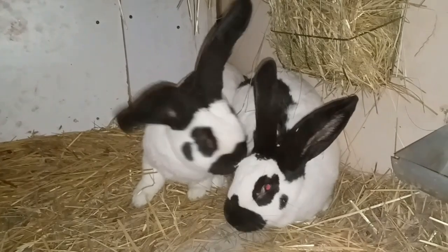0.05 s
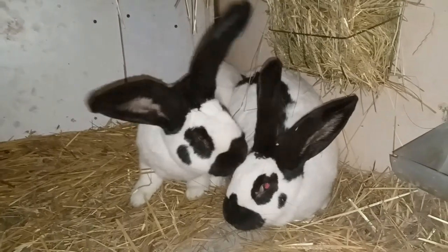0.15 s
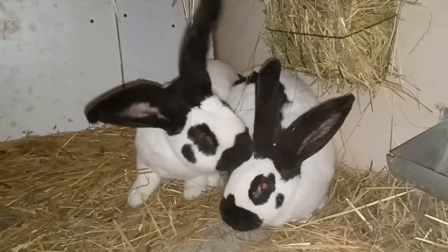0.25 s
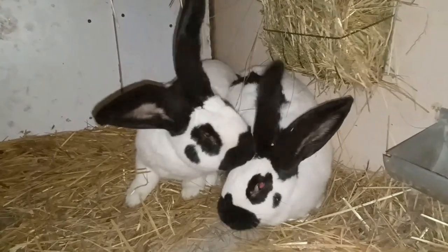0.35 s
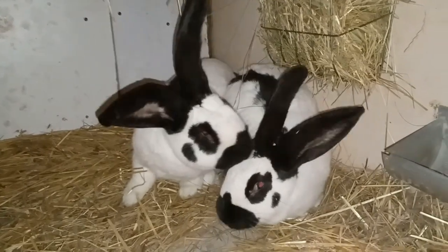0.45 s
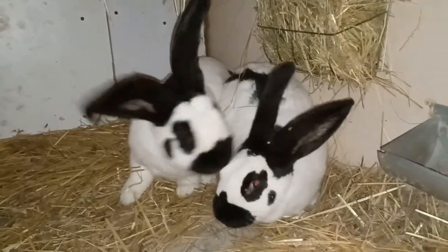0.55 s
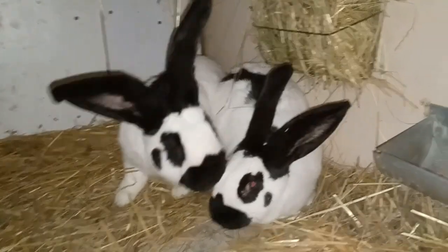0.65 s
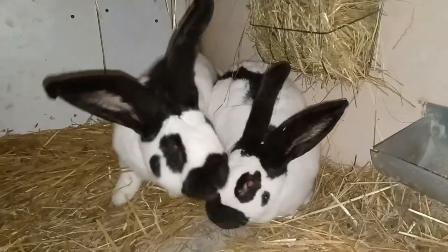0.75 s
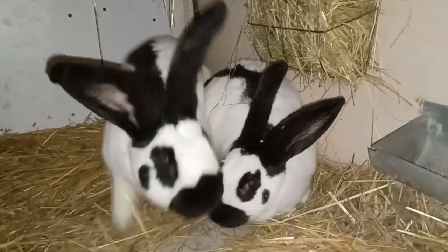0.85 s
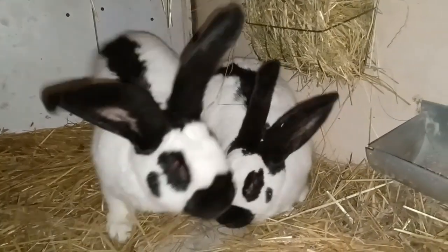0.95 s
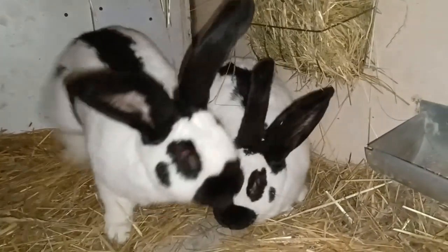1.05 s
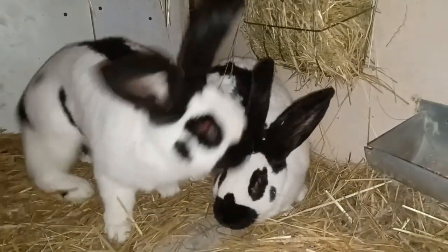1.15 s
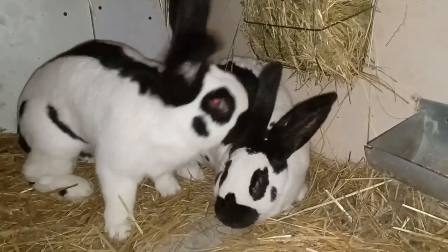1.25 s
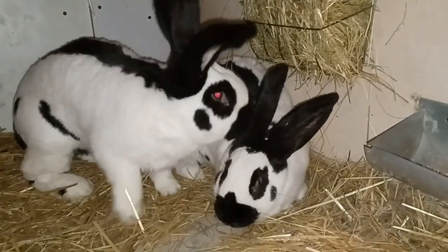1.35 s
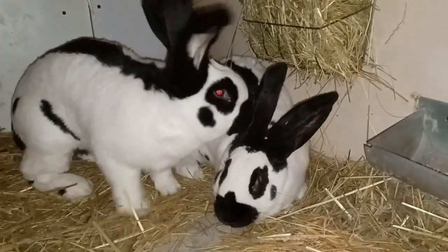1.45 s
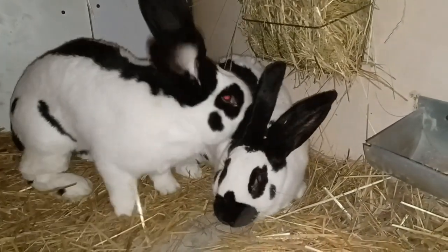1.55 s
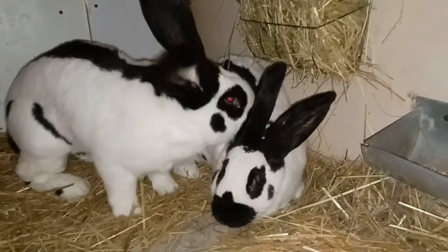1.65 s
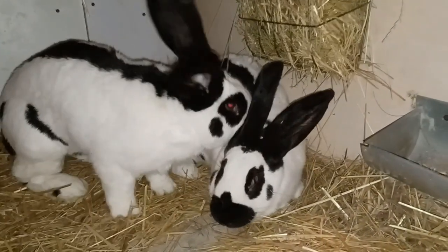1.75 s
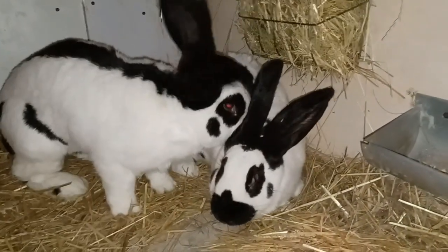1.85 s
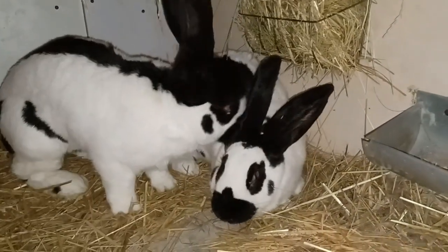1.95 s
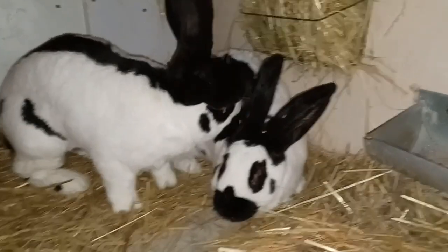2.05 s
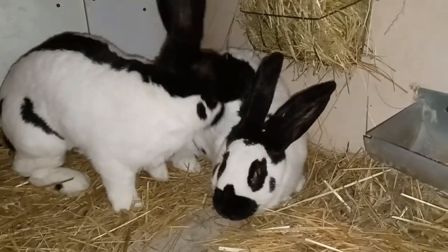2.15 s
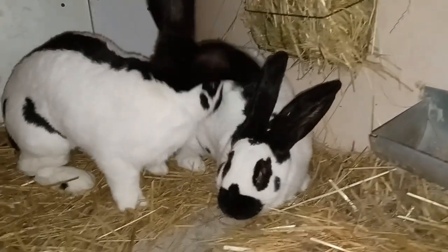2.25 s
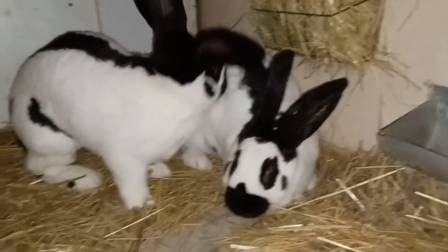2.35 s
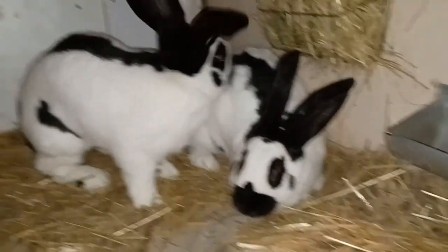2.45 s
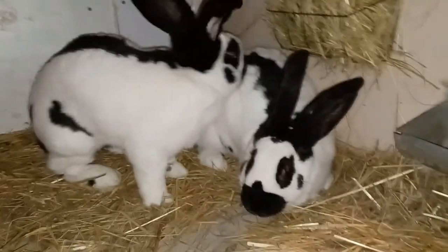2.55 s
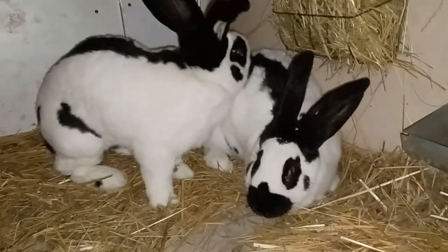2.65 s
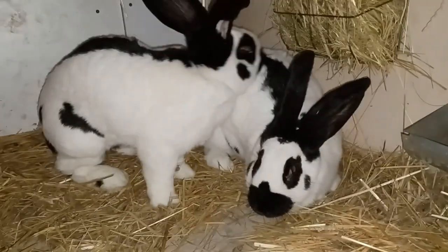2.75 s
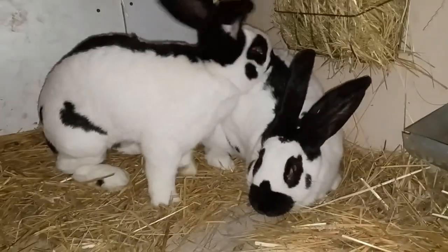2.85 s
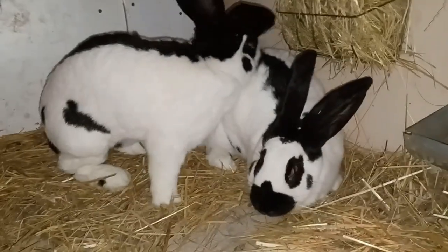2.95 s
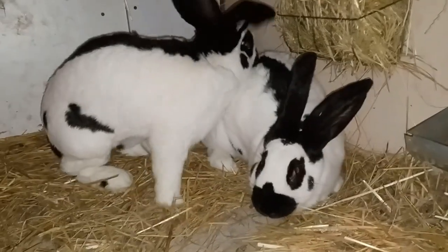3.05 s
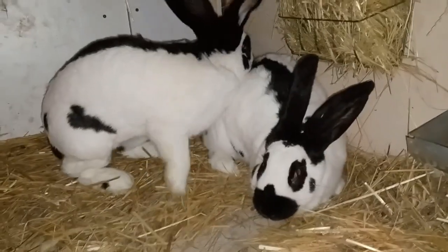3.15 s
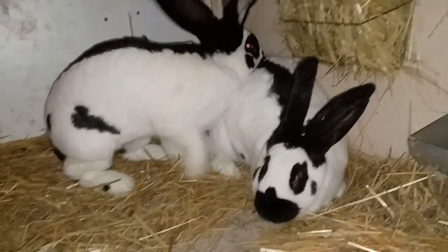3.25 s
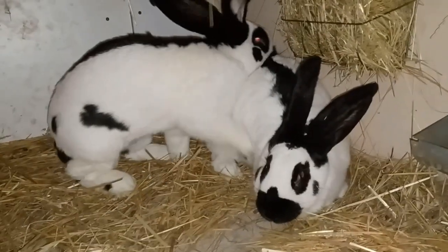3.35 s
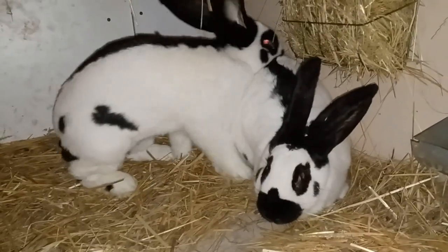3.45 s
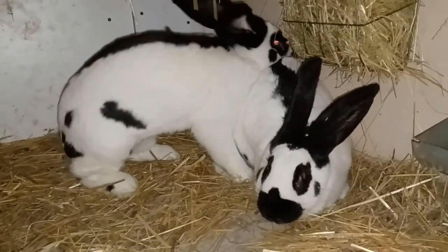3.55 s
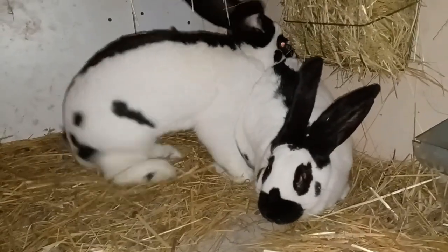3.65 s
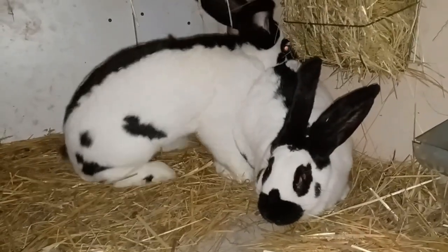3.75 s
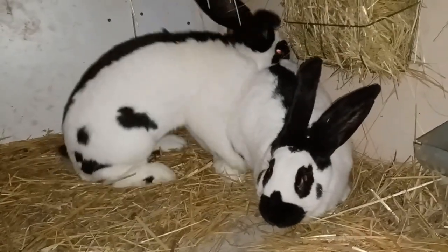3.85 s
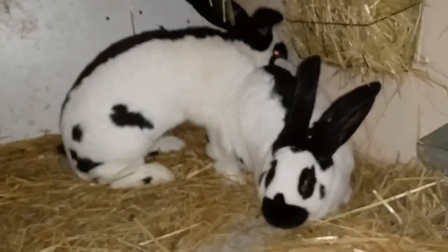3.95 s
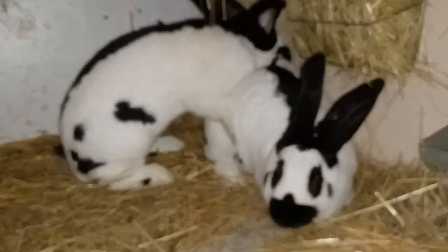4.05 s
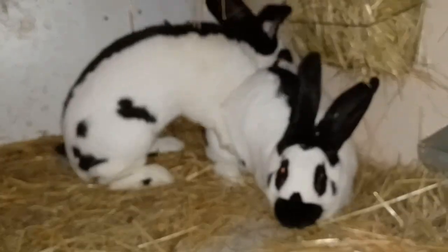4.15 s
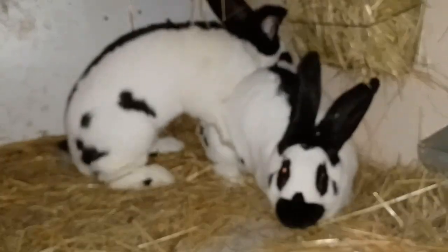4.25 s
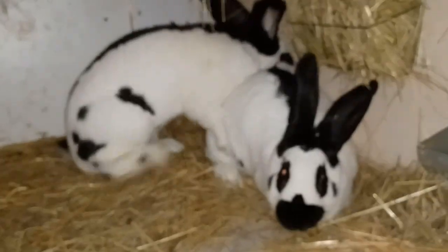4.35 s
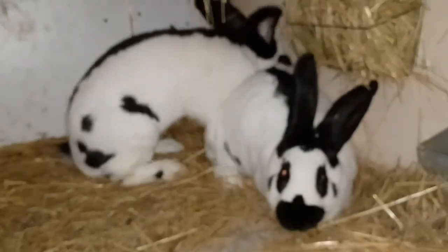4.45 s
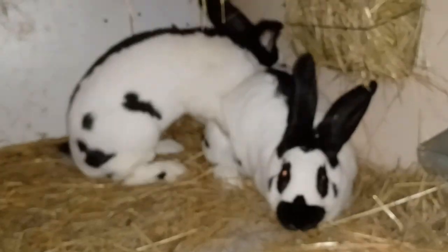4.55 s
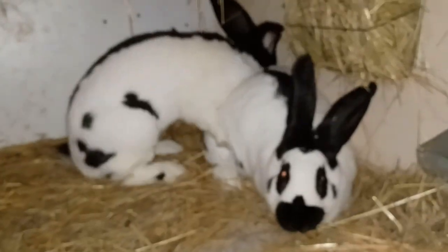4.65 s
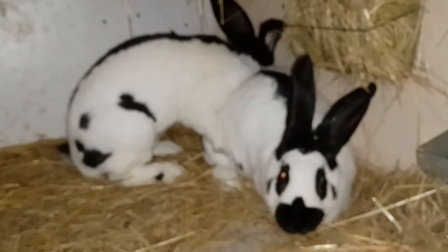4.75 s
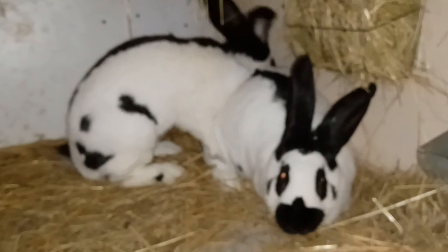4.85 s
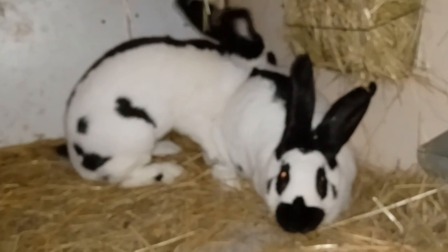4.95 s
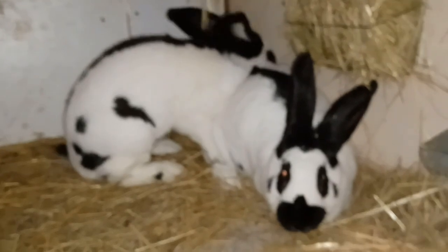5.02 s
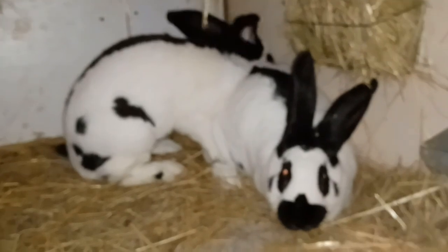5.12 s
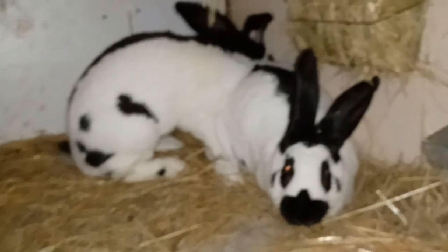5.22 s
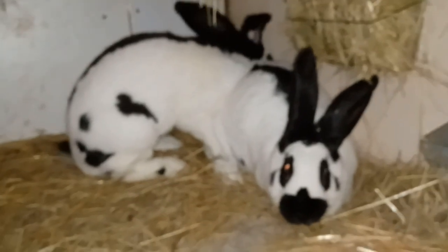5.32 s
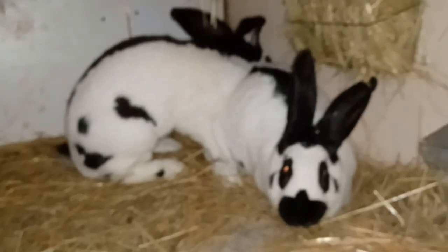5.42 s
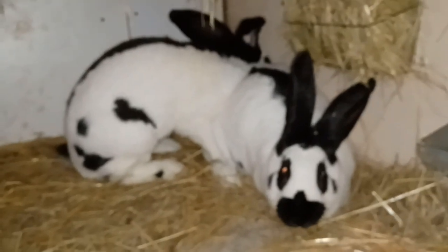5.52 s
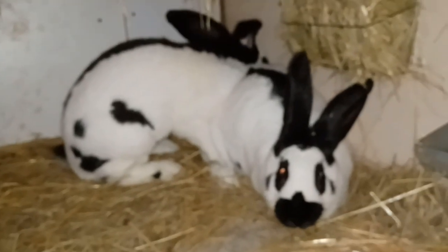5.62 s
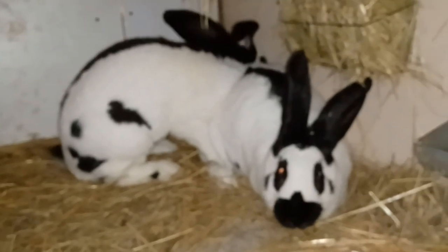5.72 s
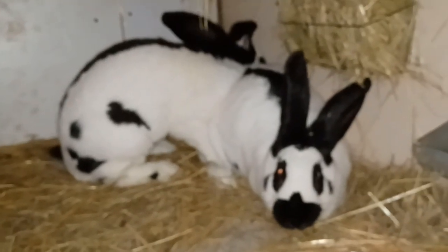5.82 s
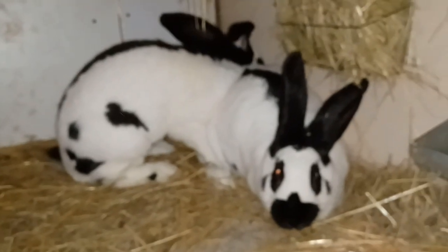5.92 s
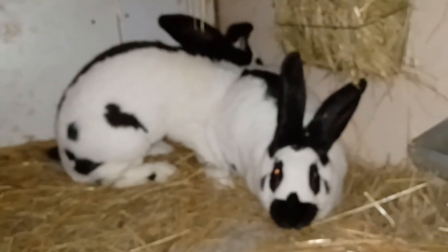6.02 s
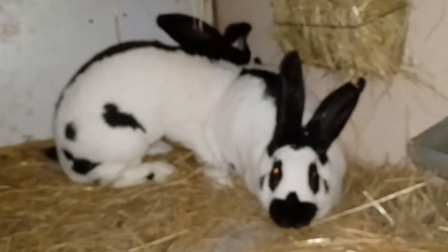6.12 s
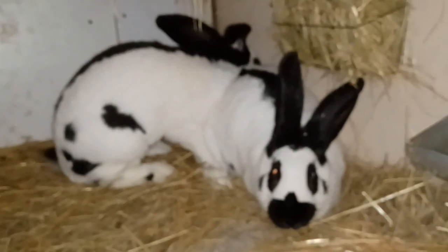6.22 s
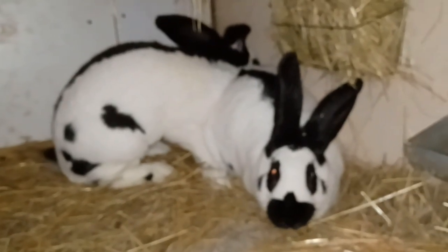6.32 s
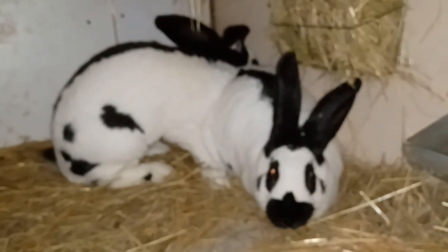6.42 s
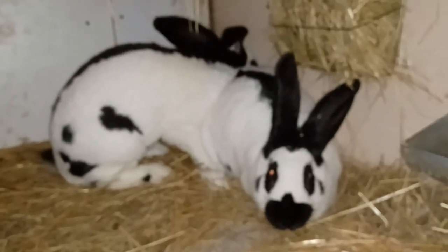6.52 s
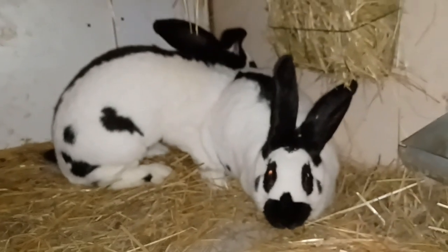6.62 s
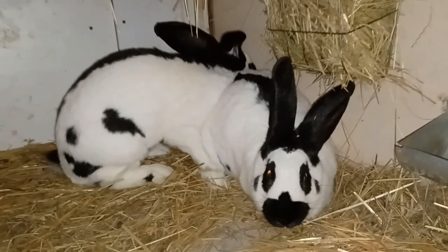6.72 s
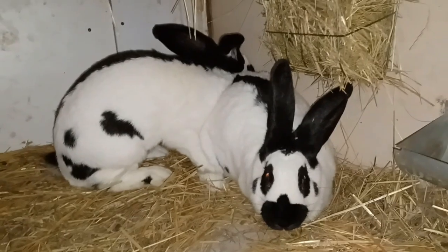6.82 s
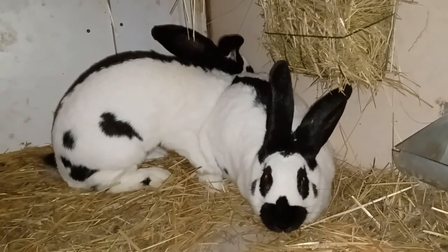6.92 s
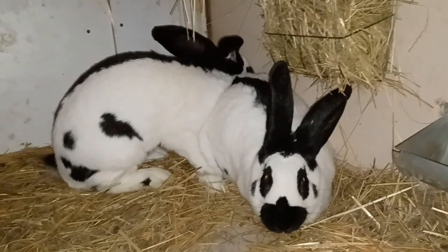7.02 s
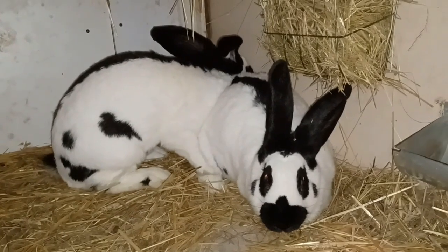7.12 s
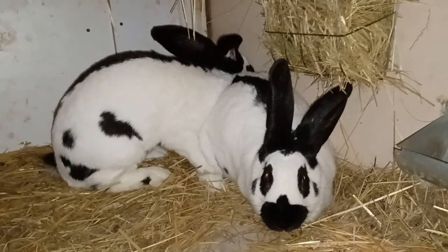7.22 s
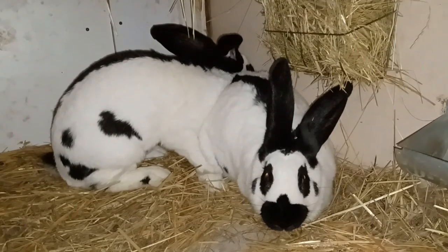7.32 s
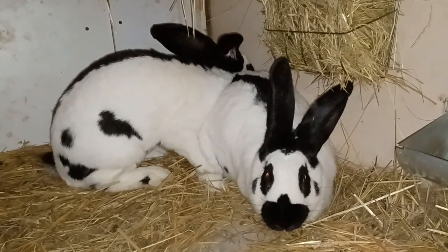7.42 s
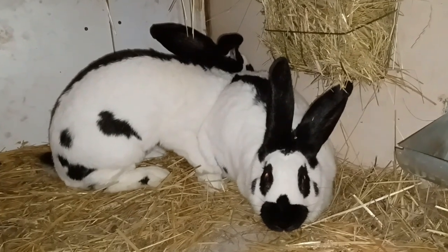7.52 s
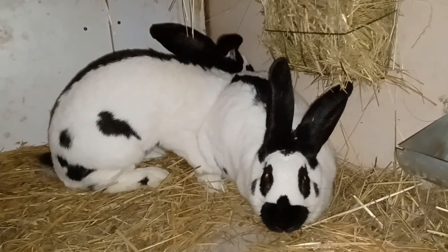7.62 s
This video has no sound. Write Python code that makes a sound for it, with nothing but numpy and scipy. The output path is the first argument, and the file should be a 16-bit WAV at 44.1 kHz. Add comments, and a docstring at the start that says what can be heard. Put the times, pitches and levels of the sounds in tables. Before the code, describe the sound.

Two rabbits shift about on straw in a wooden hutch, close to the microphone. About a second in, paws thump dully on the boards and stalks crunch and snap. Faint nibbling follows, then a second bout of rustling with another thump. Near the end something soft brushes twice along a nearby surface, with a few dry ticks. A low hush lies underneath.

```python
"""Rabbits in a wooden hutch

Close up, on a small two-port microphone, two rabbits shift about on straw: stalks rustle, crunch and
snap, paws thump on the boards, one rabbit nibbles, and faint rasps sound like sniffing. Later something
soft brushes twice along a nearby surface, with a few dry ticks. Far off, tyre noise fades over quiet air.
"""
import sys
import numpy as np
from scipy import signal
from scipy.fft import rfft, irfft
from scipy.io import wavfile

SR = 44100
rng = np.random.default_rng(int(sys.argv[2]) if len(sys.argv) > 2 else 0)


def unload_wav(signal):
    """Save mono or channel-first audio to the path in sys.argv[1] as 16-bit WAV at rate SR, clipped to [-1, 1]."""
    wavfile.write(
        sys.argv[1],
        SR,
        np.round(np.clip(np.atleast_2d(signal).T, -1, 1) * 32767).astype(np.int16),
    )


N = 338688
TIME = np.arange(N) / SR

# a rabbit shifts its weight on the bedding: (start [s], length [s], straw [dB], boards [dB])
MOVES = [(0.706, 0.063, -67.5, -55.5), (0.831, 0.14, -50.5, -48), (0.99, .04, -52, -47.5),
         (1.072, 0.15, -51, -45), (1.281, 0.24, -58, -55), (1.59, 0.74, -74, -65.5),
         (2.293, 0.077, -59.5, -59), (2.50, 0.29, -71, -73), (2.86, 0.11, -61, -77),
         (3.075, 0.24, -55, -58.5), (3.486, 0.092, -60.5, -55.5), (3.656, 0.21, -49, -44.5),
         (3.897, 0.06, -55.5, -60), (4.02, 0.13, -68.5, -78), (4.35, 0.082, -47, -61),
         (4.517, 0.065, -60.5, -58), (5.702, 0.14, -60.5, -82)]
# dull spectrum of bodies scuffing the boards: (frequency [Hz], level [dB])
SHUFFLE_COLOUR = [(20, 3), (45, -9), (70, -1.5), (110, -4.5), (175, 2.5), (250, -4), (330, -10),
                  (450, -21.5), (800, -27), (2000, -42.5)]


def from_db(db):
    """Decibels to gain."""
    return 10 ** (np.asarray(db) / 20)


def rms_one(x):
    """Scale to unit power."""
    return x / np.sqrt(np.mean(x ** 2) + 1e-20)


def in_time(rows):
    """Each column of a curve at every sample."""
    s, *columns = np.transpose(rows)
    return [np.interp(TIME, s, c) for c in columns]


def at_bins(points):
    """A spectrum table at every frequency bin."""
    hz, value = np.transpose(points)
    return np.interp(np.log(np.arange(N // 2 + 1) * SR / N + 1), np.log(hz), value)


def drift(rate):
    """A random wander through `rate` new values a second."""
    knots = rng.standard_normal(N // 10)
    return np.interp(TIME * rate, np.arange(len(knots)), knots)


def white():
    """Two unrelated white noises."""
    return rng.standard_normal((2, N))


def add(track, s, sound):
    """Mix a sound in at time s."""
    start = max(round(s * SR), 0)
    track[..., start:start + sound.shape[-1]] += sound[..., :N - start]


def ring(x, hz, t60):
    """One damped mode: a unit click sets a sine of height 1 ringing."""
    r, w = from_db(-60 / (t60 * SR)), 2 * np.pi * hz / SR
    return signal.lfilter([0, np.sin(w)], [1, -2 * r * np.cos(w), r * r], x + 1e-18)


def gesture(start, length, swell_s, decay_s):
    """An envelope that swells up to its start, holds for its length and dies away."""
    return np.exp(np.clip(np.minimum((TIME - start) / swell_s, (start + length - TIME) / decay_s), -20, 0))


def movement(start, length, swell_s=0.02, settle_db=-13.5):
    """Power of one move, with the bedding settling after it."""
    push = gesture(start, length, swell_s, decay_s=0.025)
    settling = from_db(settle_db) * gesture(start, length, swell_s, decay_s=0.13)
    return push ** 2 + settling ** 2


def colour(pair, spectrum, lean=1):
    """Give two unrelated signals a spectrum and the microphone's stereo image; lean scales the balance."""
    # balance between the two ports: (frequency [Hz], left minus right [dB])
    port_balance = [(60, 1), (200, 0), (380, -3), (700, -0.5), (1290, -3.5), (2400, -15.5), (4400, -11.5),
                    (8100, 4.5), (15000, 2)]
    # how alike the ports sound: (frequency [Hz], correlation [0-1])
    likeness = [(60, 0.72), (150, 0.93), (300, 0.58), (650, 0.23), (1400, 0), (15000, 0.015)]
    mid, side = rfft(pair) * from_db(at_bins(spectrum))
    alike, sign = at_bins(likeness), np.array([[1], [-1]])
    ports = from_db(sign * lean * at_bins(port_balance) / 2)
    ports = ports / np.sqrt(np.mean(ports ** 2, axis=0))
    return rms_one(irfft(ports * (np.sqrt(1 + alike) * mid + np.sqrt(1 - alike) * sign * side), N))


def walls(count=30, echo=0.067):
    """Early echoes off close walls ripple the spectrum differently at each port."""
    response = np.zeros((2, N))
    response[:, 0] = 1
    for port in response:
        port[(rng.uniform(.0006, .009, count) * SR).astype(int)] = echo * rng.choice([-1, 1], count)
    return rfft(response)


def grains(per_s, spread_db):
    """Tiny clicks, as of fibre slipping on fibre: random times and sizes, scattered to each port."""
    sizes = from_db(spread_db * np.minimum(rng.exponential(1, N), 5))
    clicks = white() * sizes * (rng.random(N) < per_s / SR)
    return irfft(rfft(clicks) * walls(), N)


def whine(hz, width_hz):
    """A narrow band of noise that follows a pitch; rms 1."""
    narrow = signal.sosfilt(signal.butter(2, width_hz, fs=SR, output="sos"), white() + 1j * white())
    narrow = narrow + 0.22 * narrow[::-1]   # partly shared by both ports
    return rms_one(np.real(narrow * np.exp(2j * np.pi * np.cumsum(hz) / SR)))


def air(level_db=-66):
    """The steady, low hush around the hutch."""
    # spectrum of the background: (frequency [Hz], level [dB])
    air_colour = [(20, -15), (80, 0.5), (170, -3), (400, -19.5), (1000, -19), (1700, -22), (2600, -27),
                  (3600, -33.5), (5500, -31.5), (8200, -33), (16000, -49)]
    return from_db(level_db) * colour(white(), air_colour, lean=0.19)


def tyres(core_db=-4.0, band_db=-4.5, road_db=-2.0, low_note_db=-62, waver_hz=8):
    """Far off, tread sings a thin, wavering note over a dull wash; a lower note drops out early."""
    # tyre noise fading: (time [s], tread level [dB], tread pitch [Hz], wash level [dB])
    fade = [(0, -64, 935, -61.5), (1.1, -61.5, 935, -57), (1.45, -58.5, 940, -60.5),
            (1.75, -61.5, 975, -65.5), (2.3, -74.5, 974, -61.5), (3.0, -69, 978, -66),
            (3.3, -78, 965, -71.5), (5.0, -79, 960, -75.5), (6.4, -100, 960, -100)]
    # spectrum of the wash: (frequency [Hz], level [dB])
    road_colour = [(100, 7.5), (300, 4), (600, 3), (900, 9.5), (1200, -4.5), (1600, -28), (3000, -64)]
    tread_db, hz, wash_db = in_time(fade)
    core = whine(hz + waver_hz * drift(rate=12), width_hz=14)
    tread = from_db(core_db) * core + from_db(band_db) * whine(hz * 1.04, width_hz=103)
    low_note = whine(831 + waver_hz * drift(rate=9.9), width_hz=13.6)
    low_note *= gesture(0, length=1.23, swell_s=0.1, decay_s=0.1)
    wash = colour(white(), road_colour)
    return from_db(tread_db) * tread + from_db(low_note_db) * low_note + from_db(wash_db + road_db) * wash


def sniffing(rest_db=-84.5, uneven_db=1.8):
    """Faint, narrow rasps near 2.6 kHz, like a rabbit sniffing."""
    # each rasp: (start [s], length [s], level [dB])
    rasps = [(0.613, 0.024, -81), (2.05, 0.086, -66), (3.136, 0.19, -65), (4.134, 0.3, -65.5),
             (4.36, 0.2, -64.5), (5.884, 0.16, -65), (7.15, 0.13, -66)]
    # resonance of the rasp: (frequency [Hz], level [dB])
    rasp_colour = [(1200, -13), (1750, -10.5), (2100, -16.5), (2440, -0.5), (2820, -4), (3250, -19),
                   (4100, -11.5), (5450, -13), (8000, -21), (15000, -18)]
    level = from_db(rest_db)
    for s, length, db in rasps:
        level = level + from_db(db) * gesture(s, length, swell_s=0.028, decay_s=0.063)
    level *= from_db(uneven_db * drift(rate=25))
    return level * colour(grains(per_s=7400, spread_db=1.5), rasp_colour)


def brushing(scrape_gain_db=5.0, drag_gain_db=2.0, hiss_gain_db=5.5, stutter_db=4.0):
    """Close by, soft fibres hiss and scrape; pressed harder, they stick and drag with a dull stutter."""
    # each stroke: (start [s], length [s], swell [s], full pressure at [s],
    # scrape [dB], drag [dB], hiss [dB])
    strokes = [(5.464, 0.25, 0.041, 5.57, -51.5, -51.5, -55), (6.675, 0.47, 0.084, 6.954, -57, -57.5, -56)]
    # spectra of the mid-range scrape, low drag and high hiss: (frequency [Hz], level [dB])
    scrape_colour = [(900, -15), (1500, -7.5), (1900, -1.5), (2200, -0.5), (2600, 2), (3400, -4.5),
                     (4700, -2.5), (6300, -6.5), (8000, -15), (12000, -16)]
    drag_colour = [(40, 15.5), (70, 14), (200, 8), (400, 4.5), (750, 1.5), (1300, 1.5), (2200, -11),
                   (5000, -34)]
    hiss_colour = [(2500, -4), (5000, 1), (8300, -9), (10500, 0.5), (13000, 4.5), (16000, 0.5)]
    scrape = from_db(scrape_gain_db) * colour(grains(per_s=14000, spread_db=1.0), scrape_colour)
    drag = from_db(drag_gain_db + stutter_db * drift(rate=120)) * colour(white(), drag_colour)
    hiss = from_db(hiss_gain_db) * colour(white(), hiss_colour, lean=-0.44)
    scrape_fall, drag_rise, hiss_rise = 9, 60, 16   # dB/s while the pressure builds
    out = 0
    for s, length, swell, pressed, scrape_db, drag_db, hiss_db in strokes:
        early = pressed - np.clip(TIME, s, pressed)   # seconds until full pressure
        friction = (from_db(scrape_db + scrape_fall * early) * scrape
                    + from_db(drag_db - drag_rise * early) * drag
                    + from_db(hiss_db - hiss_rise * early) * hiss)
        out = out + gesture(s, length, swell, decay_s=0.036) * friction
    return out


def ticks(crack_db=-0.5, ring_db=0.5, overtone_db=-2.5, overtone_ratio=1.79, left_db=-12.0, right_db=3):
    """To the right, dry ticks: a millisecond crack with a two-note ring; a squeak is nearly all ring."""
    # ticks and tiny squeaks: (time [s], level [dB], pitch [Hz], ring [s], crack share [0-1])
    events = [(1.719, -61, 3030, 0.015, 0.2), (2.821, -61.5, 2650, 0.02, .02),
              (3.214, -42, 2230, 0.0011, 0.61), (5.338, -58, 1695, 0.033, 0.1),
              (5.4612, -21, 2540, 0.00062, 0.45), (5.595, -29, 2600, 0.00062, 0),
              (5.641, -34.5, 780, 0.0019, .15), (6.064, -47.5, 2020, 0.0009, .5),
              (6.675, -34, 3020, 0.0012, 0.7), (6.7531, -27.5, 2450, 0.0011, 0.4),
              (6.779, -38, 3060, 0.0024, 0.5), (7.0998, -28.5, 2200, 0.001, 0.53)]
    out, t = np.zeros((2, N)), TIME[:SR // 8]
    band = signal.butter(2, [900, 7500], "band", fs=SR, output="sos")
    for s, db, hz, ring_s, share in events:
        crack = signal.sosfilt(band, rng.standard_normal((2, len(t))) * np.exp(-t / .0011))
        phase = 2 * np.pi * hz * t
        overtone = from_db(overtone_db) * np.sin(overtone_ratio * phase) * np.exp(-t / 0.0035)
        envelope = np.exp(-t / ring_s) * (1 - np.exp(-t / (0.12 * ring_s)))
        tone = (np.sin(phase) + overtone) * envelope
        add(out, s, from_db(db) * (share * from_db(crack_db) * crack + from_db(ring_db) * tone))
    return out * from_db([[left_db], [right_db]])


def shuffle(gain_db=2.5, lumpy_db=3.0):
    """Small shifts of weight keep the boards murmuring; every move makes them rumble."""
    # the murmur dies down as the rabbits come to rest: (time [s], level [dB])
    murmur = [(0, -64), (2.0, -64.5), (3.2, -60), (4.1, -64.5), (4.7, -60), (5.95, -62.5), (6.5, -73),
              (7.0, -70.5), (7.68, -71)]
    murmur_db, = in_time(murmur)
    moving = sum(from_db(db) ** 2 * movement(s, length) for s, length, _, db in MOVES)
    level = np.sqrt(from_db(murmur_db) ** 2 + moving)
    return level * from_db(gain_db + lumpy_db * drift(rate=18)) * colour(white(), SHUFFLE_COLOUR)


def nibbling(swell_s=0.013, hold_s=0.0071, decay_s=0.045, crumble_db=2.5):
    """A rabbit nibbles: each bite swells quickly, holds a moment and crumbles away."""
    # bites, in runs of about five a second: (time [s], level [dB])
    bites = [(0.10, -66), (0.60, -70), (2.057, -55.5), (2.318, -57), (2.488, -58.5), (2.675, -63),
             (2.874, -58), (3.072, -61), (4.13, -62), (4.751, -60.5), (4.955, -63.5), (5.149, -62.5),
             (5.345, -61.5), (6.005, -60), (6.227, -61.5), (6.434, -64.5), (7.225, -61.5), (7.333, -65.5),
             (7.444, -61.5), (7.646, -63)]
    # crisp spectrum of a bite: (frequency [Hz], level [dB])
    bite_colour = [(600, -26), (1700, -5.5), (2100, -10.5), (2650, 4.5), (3500, -4.5), (5500, 1.5),
                   (8300, -8), (11000, -5.5), (13500, -5.5), (16000, -3.5)]
    envelope, t = np.zeros(N), TIME[:SR // 2] - .08
    shape = np.exp(np.minimum(np.minimum(t / swell_s, (hold_s - t) / decay_s), 0))
    for s, db in bites:
        add(envelope, s + t[0], from_db(db) * shape)
    envelope *= from_db(crumble_db * drift(rate=91))
    return envelope * colour(grains(per_s=10000, spread_db=2.0), bite_colour, lean=0.75)


def thumps(boards_db=-4.0, far_port_db=-1.7, scuff_db=-15.5):
    """The bedding cushions each blow into a few low cycles and a dull scuff; the floor rings faintly."""
    # paws and bodies land, pitched by the spot: (time [s], level [dB], pitch [Hz], swell [s])
    landings = [(0.101, -52.5, 153, 0.023), (0.434, -45.5, 94, 0.0099), (0.676, -47.5, 123, 0.017),
                (0.806, -36.5, 119, 0.011), (0.900, -14.5, 182, 0.006), (0.912, -12.5, 102, 0.0058),
                (0.933, -20, 108.6, 0.0077), (1.112, -29, 95, 0.017), (1.153, -26, 213, 0.0056),
                (1.786, -47, 155, 0.012), (3.079, -49.5, 213, 0.014), (3.346, -43.5, 107, 0.009),
                (3.471, -35.5, 110, 0.015), (3.689, -47, 214, 0.011), (3.784, -19.5, 89.6, 0.0075),
                (3.826, -42, 228.6, 0.02), (4.429, -39.5, 227, 0.0097), (4.846, -42.5, 95, 0.011),
                (5.047, -49.5, 83.6, 0.014), (5.245, -49.5, 93, 0.019), (5.4, -30.5, 72, 0.012),
                (5.404, -32.5, 131, 0.0073), (5.443, -31, 77, 0.02), (6.149, -47.5, 88, 0.015),
                (6.849, -49.5, 73.5, 0.018), (7.088, -43.5, 82, 0.02)]
    # modes of the hutch floor: (frequency [Hz], t60 [s], level [dB])
    floor_modes = [(65.7, 0.19, -9), (93.5, 0.25, -22), (167, 0.12, -20), (225.3, 0.33, -26),
                   (325, 0.16, -29), (380, 0.11, -60)]
    wood, blows, pressure = np.zeros((3, N))
    t = TIME[:SR // 3]
    for s, db, hz, swell in landings:
        envelope = from_db(db) * (t / swell * np.exp(1 - t / swell)) ** 1.3
        add(wood, s, envelope * np.sin(2 * np.pi * hz * t))
        add(pressure, s, envelope)
        add(blows, s, from_db([db]))
    for hz, t60, db in floor_modes:
        wood += from_db(db + boards_db) * ring(blows, hz, t60)
    scuff = from_db(scuff_db) * pressure * colour(white(), SHUFFLE_COLOUR)
    return wood * from_db([[0], [far_port_db]]) + scuff


def straw(rest_db=-84, stir_db=0.9, flutter_db=1.0, snap_db=-7.0, snap_s=0.004, tail_s=0.041):
    """Stalks slide over each other in fits and starts, crunch under a paw and snap one by one."""
    # a paw crushes a tuft: (time [s], level [dB], swell [s])
    crunches = [(0.864, -37.5, 0.021), (0.895, -26, 0.0048), (1.029, -41, .008), (1.113, -35.5, 0.036),
                (1.149, -28.5, 0.009), (1.477, -43, 0.013), (2.365, -53.5, .004), (3.086, -47.5, 0.0064),
                (3.155, -45.5, 0.005), (3.268, -49, 0.0048), (3.653, -31.5, 0.02), (3.672, -34, 0.024),
                (3.778, -36.5, 0.0087), (3.840, -39, 0.0085), (4.394, -43.5, 0.018), (4.439, -44, 0.014)]
    # a stalk breaks and stirs its neighbours: (time [s], level [dB], tail relative to the snap [dB])
    snaps = [(0.7793, -45.5, -3.5), (1.1463, -25.5, -5), (1.3064, -36.5, -9), (1.4716, -36, -2.5),
             (1.6691, -44, -22), (1.681, -41.5, -10.5), (1.8856, -62, -20), (2.745, -46.5, -10),
             (3.0222, -45, -22), (3.1388, -36.5, -5.5), (3.464, -38, -8.5), (3.487, -35.5, -7),
             (3.5163, -32, -15), (3.8524, -36, -19), (4.3321, -42.5, -6), (4.5785, -46, -12)]
    # bright spectrum of straw: (frequency [Hz], level [dB])
    straw_colour = [(200, -21), (450, -11.5), (900, -3.5), (1700, -7), (2200, -1.5), (2800, 4.5), (3600, 2),
                    (5400, 3), (8300, -4.5), (10500, -0.5), (13000, 4.5), (15800, 2)]
    sliding = sum(from_db(db) ** 2 * movement(s, length) for s, length, db, _ in MOVES)
    power = (from_db(rest_db) ** 2 + sliding) * from_db(stir_db + flutter_db * drift(rate=92)) ** 2
    t = TIME[:SR // 2] - 1 / 4
    for s, db, swell in crunches:
        decay_s = 0.013 + 0.45 * swell   # a slower crunch lingers longer
        crunch = from_db(db) * np.exp(np.minimum(t / swell, -t / decay_s))
        add(power, s + t[0], crunch ** 2)
    t = TIME[:SR // 4]
    for s, db, tail_db in snaps:
        snap = np.exp(-t / snap_s) ** 2 + (from_db(tail_db) * np.exp(-t / tail_s)) ** 2
        add(power, s, from_db(db + snap_db) ** 2 * snap)
    # about 35 times a second a thin stalk gives way and stands out for a few milliseconds
    gives_way = rng.random(N) < 35 / SR
    slips = signal.lfilter([1], [1, -np.exp(-1 / (.002 * SR))], gives_way + 1e-18)
    crackle = grains(per_s=14000, spread_db=1.5) * (1 + slips)
    return np.sqrt(power) * colour(crackle, straw_colour, lean=0.78)


def scene():
    """Rabbits and small noises close up, tyres and air behind them."""
    hush = air()
    rabbits = straw() + nibbling() + thumps() + shuffle()
    return rabbits + sniffing() + brushing() + ticks() + tyres() + hush


def record(dry, low_cut_hz=59, high_cut_hz=15900):
    """The small microphone loses the deepest bass; the top is cut steeply."""
    hz = np.arange(N // 2 + 1) * SR / N
    bass_loss = np.maximum(1 / np.sqrt(1 + (low_cut_hz / (hz + 1)) ** 14), .12)
    thinned = irfft(rfft(dry) * bass_loss, N)
    return signal.sosfilt(signal.ellip(12, .1, 90, high_cut_hz, fs=SR, output="sos"), thinned)


dry = scene()
out = record(dry)
unload_wav(out)
```